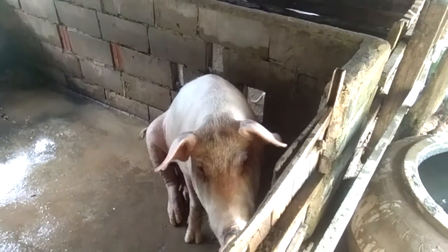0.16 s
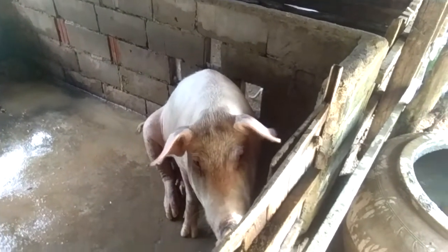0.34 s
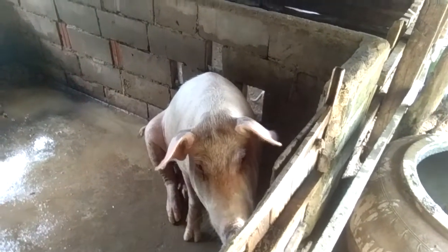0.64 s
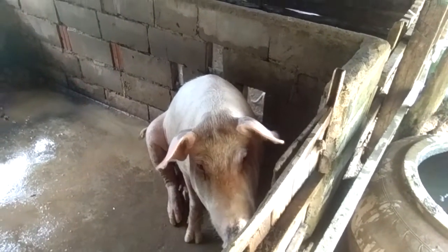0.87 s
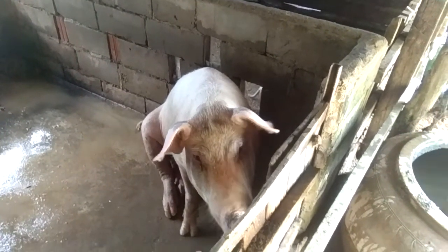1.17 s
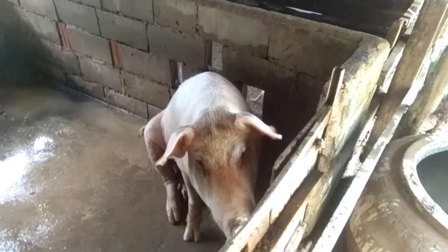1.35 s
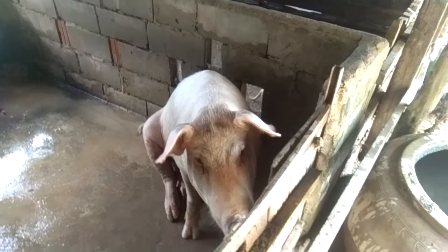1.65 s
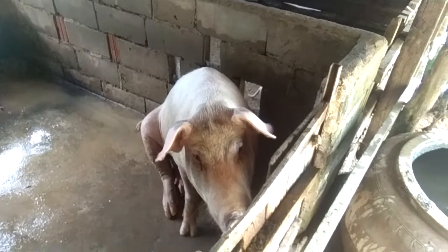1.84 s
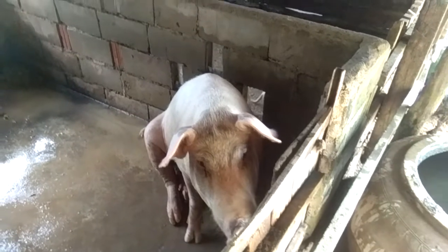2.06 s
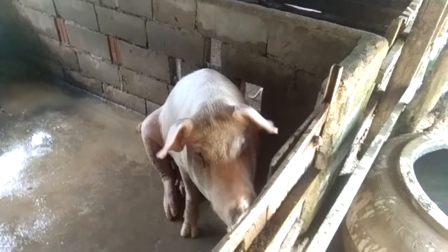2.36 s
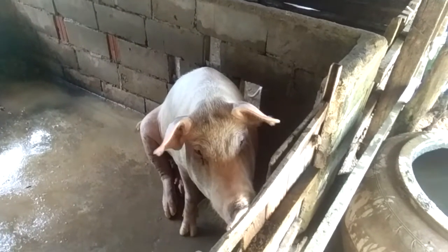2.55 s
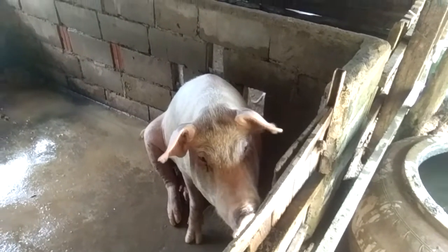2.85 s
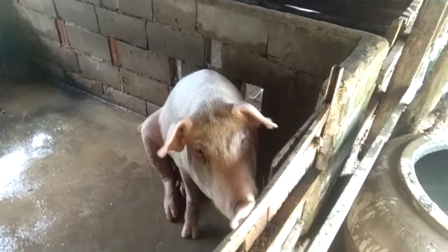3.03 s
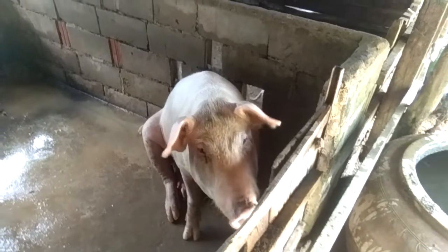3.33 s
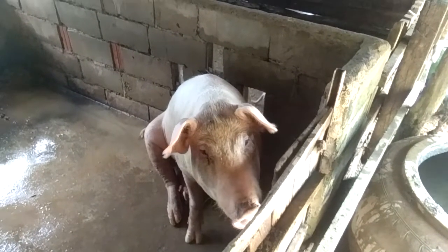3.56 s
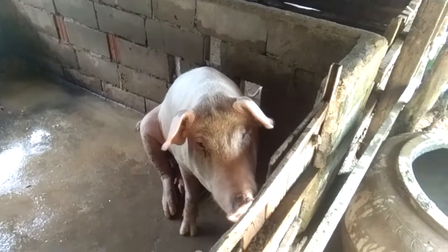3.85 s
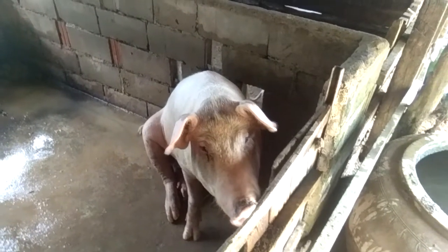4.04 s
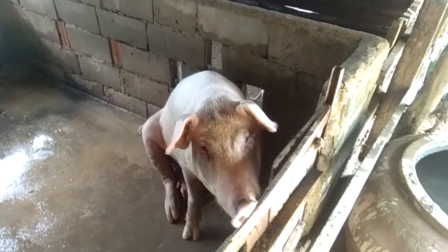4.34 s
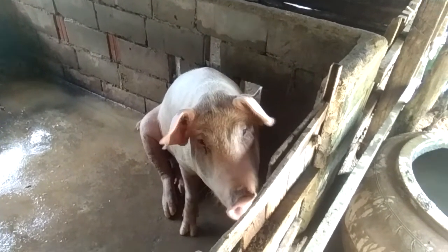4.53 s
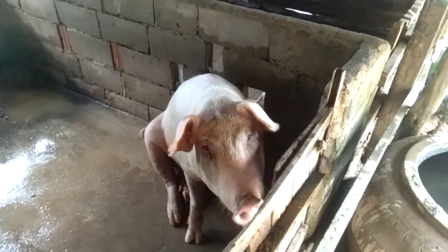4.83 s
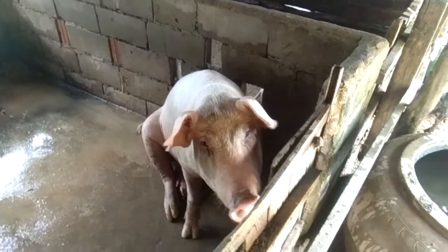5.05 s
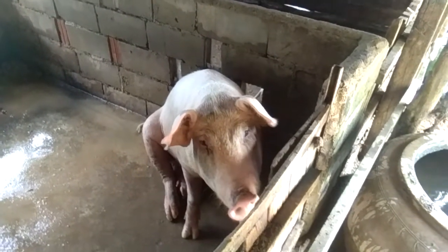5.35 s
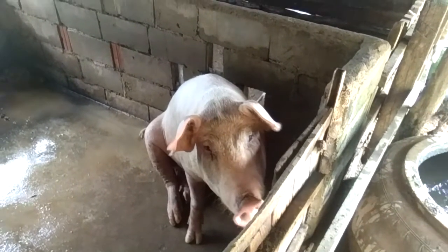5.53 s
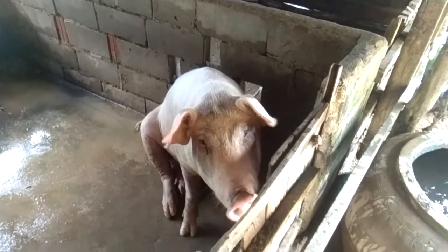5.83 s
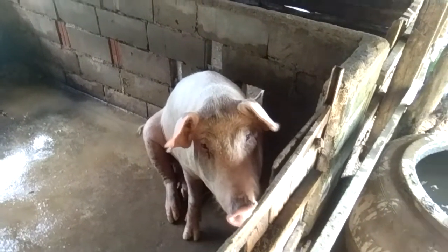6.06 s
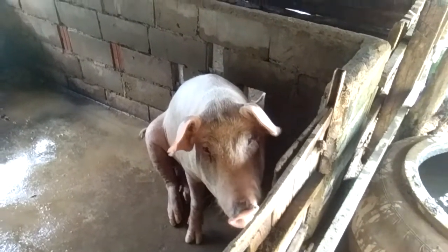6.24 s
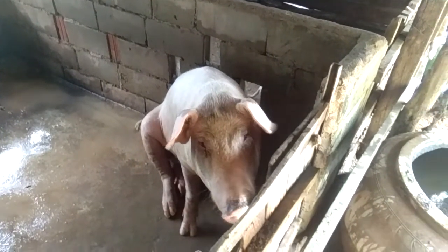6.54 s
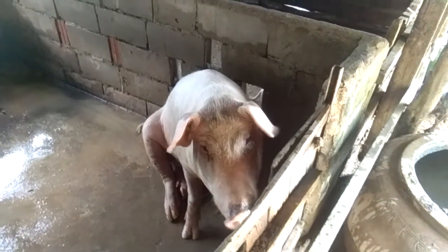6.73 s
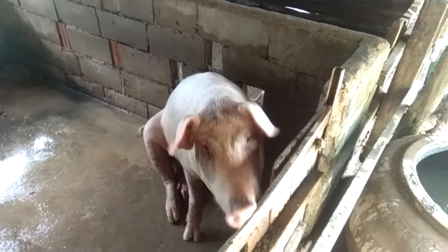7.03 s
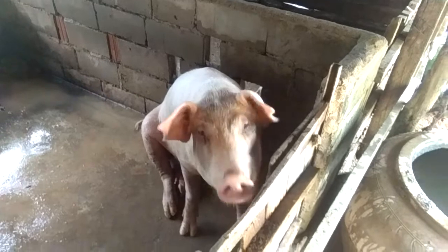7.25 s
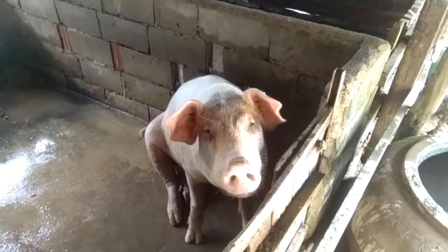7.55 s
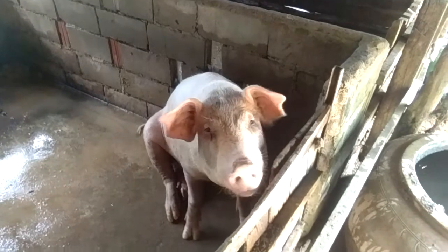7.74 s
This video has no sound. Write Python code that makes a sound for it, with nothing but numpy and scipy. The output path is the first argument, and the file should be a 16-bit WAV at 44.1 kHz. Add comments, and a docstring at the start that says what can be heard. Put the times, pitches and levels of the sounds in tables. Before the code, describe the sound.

A pig gives seven short, low, pulsing grunts in a concrete pen, with snuffles, knocks, a brief gurgle of water and faint chick peeps.

```python
"""A pig grunts seven times in a concrete pen, with soft growls, snuffles, knocks and smacks in between.
Each grunt is a few slow beats of the vocal folds ringing its throat and snout; the walls answer.
Growls are weak pulses in chest and nose, and snuffles are shaped noise. Water in a tank beside the pen
is noise spray over many ringing bubbles. Chicks whistle falling peeps, a hen gives short rough clucks,
low hum and noise make the yard air, and a far thin call of steady overtones sets in at the end."""
import sys
import numpy as np
from scipy import signal
from scipy.fft import rfft, irfft
from scipy.io import wavfile

SR = 44100
rng = np.random.default_rng(int(sys.argv[2]) if len(sys.argv) > 2 else 0)


def store_wav(level_fs):
    """Save 16-bit WAV to argv[1]."""
    pcm = np.round(np.clip(np.atleast_2d(level_fs), -1, 1) * 32767)
    wavfile.write(sys.argv[1], SR, pcm.T.astype(np.int16))


N = 347949
TIME = np.arange(N) / SR

# still yard air: f/Hz, relative level per Hz/dB
AIR_COLOUR = [(15, -60), (25, -8), (49, -30), (75, 3.5), (113, -2.5), (246, -1), (741, -8.5), (1170, -9.5),
              (1950, -14), (3340, -13), (4870, -19), (6380, -20), (8350, -25), (11500, -14.5), (15500, -22)]
AIR_DB, HUM_HZ = -58.5, 62

# air through the snout: f/Hz, relative level/dB
SNOUT_AIR_COLOUR = [(600, 0.5), (1500, 3), (3500, -3.5), (6000, -4.5), (8500, -12), (10000, -4.5),
                    (11700, 3.5), (13500, -7), (16000, -47)]
# the stronger sniffs: peak t/s, rise/s, level/dB
STRONG_SNIFFS = [(.29, 0.021, -55), (1.13, 0.059, -59), (1.3, 0.056, -57), (1.87, .03, -54.5),
                 (2.22, 0.095, -57), (2.56, 0.036, -59), (3.12, 0.095, -59), (3.71, 0.1, -55),
                 (4.38, 0.36, -60.5), (5.33, .1, -56), (6.8, 0.19, -58)]
SNIFF_FALL_PER_RISE = 1.55
PUFF_LAG_S, PUFF_RISE_S, PUFF_FALL_S = 0.066, 0.099, 0.097  # air let out after the last beat of each grunt
NOSING_DB, NOSING_SWING_DB, NOSING_RATE = -69, 2, 7.3  # faint restless air; rate in random levels per second

# short rough arched notes in pairs: a hen's clucks, and last a low note under the far call:
# t/s, first note level/dB, second note level/dB, f near the top of the first arch/Hz
NOTE_PAIRS = [(.102, -49, -50, 887), (.615, -53, -51, 884), (1.33, -54.5, -51.5, 933),
              (1.933, -53.5, -55.5, 856), (7.768, -39.5, -59, 730)]
CLUCK_S, CLUCK_GAP_S, CLUCK_DROP = 0.0273, .049, .86  # note length, spacing, pitch factor of the second note

# peeps at set times, most of them louder: t/s, length/s, top f before scoop and fall/Hz, fall/Hz, level/dB
TIMED_PEEPS = [(0.372, 0.056, 3290, 600, -56.5), (.402, .087, 3380, 446, -59.5),
               (.548, 0.032, 3190, 654, -55), (1.478, 0.076, 3400, 554, -56.5),
               (1.743, .051, 3330, 450, -61), (2.072, .058, 3390, 750, -56.5),
               (2.211, 0.046, 3600, 300, -54.5), (2.326, .043, 3090, 700, -57),
               (2.39, .068, 3620, 348, -57), (2.405, 0.046, 3075, 800, -56.5),
               (2.933, 0.121, 3510, 100, -56), (3.15, 0.076, 3680, 597, -57.5), (3.47, .06, 3350, 500, -59),
               (4.055, .1, 3450, 754, -60), (4.84, .1, 3620, 900, -64.5), (5.04, .09, 3660, 750, -61.5),
               (6.554, 0.043, 3300, 550, -57.5), (7.493, .037, 3300, 450, -56)]
# other peeps of the brood, at random: middle level, pitch and length, and fall per second of length
FLOCK_DB, FLOCK_TOP_HZ, FLOCK_PEEP_S, FLOCK_SAG_HZ_PER_S = -61.5, 3510, 0.07, 15000

# smacks of the lips, slaps of water, and snout and trotters against rail and floor:
# t/s, starting level/dB, time to die by 60 dB/s, centre f/Hz, spread/octaves
TAPS = [(.286, -50, 0.11, 5000, 1.8), (.92, -44, 0.039, 4950, .17), (1.7, -54.5, 0.14, 2020, .18),
        (2.795, -44, 0.092, 990, .55), (3.757, -47, 0.18, 2040, 1.4), (3.874, -48.5, .04, 12000, .32),
        (5.582, -38.5, 0.24, 1180, .62), (5.94, -36.5, 0.051, 636, 0.32), (5.967, -31.5, 0.065, 680, 0.87),
        (6.295, -34.5, 0.048, 10500, 0.14), (6.454, -40.5, 0.018, 6000, 0.95),
        (6.6661, -27.5, .015, 1980, 0.85), (6.667, -27, 0.015, 11200, .27), (6.755, -42, .048, 12300, .17),
        (7.003, -45, .03, 4730, .12)]

# grunts: t/s, number of beats, level of the first beat/dB, level two thirds through/dB, level of the last
# beat/dB, opening brightness/dB per octave, jaw factor on the first formant, mouth gain near 1 kHz at the
# last beat (half that at the first)/dB, snout gain near 2.4 kHz at the first beat (fades to 0)/dB,
# closing puff level/dB
GRUNT_LIST = [(.779, 4, -8.5, -2, -2.5, 2, 1.037, 0.5, 9.5, -50),
              (3.317, 5, -9.5, -.5, -14, 2, 1, -1, 13, -48),
              (4.583, 4, -7.5, 1.5, -9, 0.8, 1.053, 1, 6.5, -54),
              (5.174, 3, -1, 2, 2.5, 0.26, 1.07, -1.5, -8, -61),
              (6.052, 4, -6.5, 1.5, -3, 0.2, 1.055, 2, 3.5, -61),
              (7.0567, 3, -3.5, .5, 5.5, .5, 1.085, 5, 3, -56.5),
              (7.643, 4, -3, 3.5, -2.5, 2, 1.22, 2.5, -7, -53)]
# throat and snout resonances: f/Hz, width/Hz, level/dB
THROAT_RESONANCES = [(90, 35, 13.5), (154, 87, 2), (238, 112, 16.5), (329, 113, 25.5), (423.5, 69, 15.5),
                     (580, 70, 13.5), (794, 100, 1), (1011, 159, 14), (1248, 160, 7), (1465, 127, 12),
                     (1567, 220, 5.5), (2246, 1040, -5), (3250, 610, 2.5), (4020, 860, -12),
                     (5160, 630, -7), (6390, 380, -10), (11300, 2200, -16)]
BEAT_S = .0343  # from one beat to the next
# the soft beat before a grunt: how early, dB against the main level, dB per octave
LEAD_S, LEAD_DB, LEAD_BRIGHT = .027, -17.5, -2
END_BRIGHT, BRIGHT_PER_DB = -0.53, 0.1035  # a grunt ends duller (dB per octave) the weaker its last beat is
CHEST_PER_SNOUT_DB = 0.44  # a grunt that goes through the snout also has the fuller bass

# soft closed-mouth growls: t/s, length/s, level/dB, pitch f/Hz, chest f/Hz, nose f/Hz, nose level/dB
GROWL_LIST = [(1.36, 0.068, -51, 87.7, 200, 480, 2), (1.409, 0.083, -41.5, 177.9, 213, 513, 2),
              (4.224, .036, -51.5, 113.6, 246, 596, -7), (4.293, .18, -48.5, 70.06, 193, 620, -3.5),
              (5.112, .055, -38, 104.8, 310, 445, -20), (5.268, 0.13, -49, 61, 192, 360, -9),
              (6.635, 0.23, -50, 58, 206, 730, -6.5)]
ROUGH_AT_100_HZ, ROUGH_PER_OCTAVE = .5, -0.294  # the lower a growl, the rougher

# gushes of water into the tank: t/s, length/s, flow level/dB
GUSH_LIST = [(5.37, .048, -40.5), (5.457, .045, -40.5), (5.556, 0.04, -44), (5.61, 0.52, -49.5),
             (5.69, 0.14, -45), (5.931, 0.075, -45.5), (6.097, 0.17, -42)]
# droplets: f/Hz, relative level/dB
DROPLET_COLOUR = [(2500, -10), (4000, -7), (6000, -1), (8500, -5.5), (11500, 8), (13500, 0), (16000, -10)]
# slosh: f/Hz, relative level/dB
BUBBLE_COLOUR = [(300, 10), (600, -6.5), (1000, -0.5), (2000, -1), (3500, -2), (6000, -9), (9000, -24)]
GUSH_RISE_S, GUSH_FALL_DB_PER_S = 0.03, 315
SETTLE_DB, SETTLE_FALL_DB_PER_S = -15.5, 30  # the water keeps stirring: dB against the gush, and its decay
SLOSH_DB, SLOSH_FOLLOW, FULL_FLOW_DB = -42.5, .85, -40.5  # slosh at full flow, and its dB per dB of flow
# the loudest bubbles: t/s, level/dB, starting f/Hz
LOUD_BUBBLES = [(5.4, -36.5, 2504), (5.455, -36, 2350), (5.592, -34, 457), (5.675, -33, 866),
                (5.7, -34.5, 717), (5.78, -34, 794), (5.862, -36, 631), (6.23, -36, 850),
                (6.247, -37, 2440)]
FAINT_PLOP_DB, FAINT_PLOP_LOW_HZ, FAINT_PLOP_HIGH_HZ = -42, 447, 1910

# overtones of the far call: multiple of its pitch, relative level/dB
CALL_OVERTONES = [(1, 0), (2, -1), (3, -17), (4, -27), (5, -10.5), (6, -24), (8, -25)]
CALL_HZ, CALL_DB, CALL_START_S = 755, -37, 7.617
CALL_RISE_S, CALL_HOLD_S, CALL_FALL_DB_PER_S = 0.042, .16, 183  # the hold includes the rise

# ring of the pen: f/Hz, time to die by 60 dB/s
PEN_RING = [(100, 0.38), (400, 0.23), (1200, 0.25), (3500, 0.19), (12000, 0.19)]
# first echoes off the walls: delay/s, gain as a plain factor
WALL_ECHOES = [(.0042, 0.14), (0.0119, 0.062), (0.0179, .16), (.021, 0.017)]
EDGE_HZ = 15750


def amp(db):
    """Turns decibels into a plain factor."""
    return 10 ** (np.asarray(db) / 20)


def unit(x):
    """Scales x to an average strength (rms) of 1."""
    return x / np.sqrt(np.mean(x ** 2) + 1e-20)


def read(points, hz):
    """Reads a curve joined by straight lines over log frequency."""
    f, value = np.transpose(points)
    return np.interp(np.log(hz + 1), np.log(f + 1), value)


def add(mix, s, sound):
    """Lays a sound into the mix from second s, cut at the end of the mix."""
    part = mix[max(round(s * SR), 0):][:len(sound)]
    part += sound[:len(part)]


def colour(x, points):
    """Shapes the spectrum of x and gives it an rms of 1."""
    gain = amp(read(points, np.fft.rfftfreq(len(x), 1 / SR)))
    return unit(irfft(rfft(x) * gain, len(x)))


def causal(gain):
    """The sharpest-starting ring (minimum phase) with this gain at each frequency."""
    both_sides = np.r_[gain, gain[-2:0:-1]]
    log_gain = np.log(np.maximum(both_sides, 1e-5))
    return np.fft.ifft(np.exp(np.conj(signal.hilbert(log_gain)))).real


def resonate(x, hz, width):
    """A resonance of gain 1 whose pitch can follow a curve."""
    turn = np.exp(2j * np.pi * np.cumsum(hz * np.ones(len(x))) / SR)
    r = np.exp(-np.pi * width / SR)
    # shift the band down to zero, smooth it, shift it back up
    return 2 * (turn * signal.lfilter([1 - r], [1, -r], x / turn)).real


def band(x, hz, width):
    """Two equal resonances in a row, scaled to rms 1."""
    return unit(resonate(resonate(x, hz, width), hz, width))


def noise(t):
    """White noise as long as t, up to half a second."""
    return rng.standard_normal(SR // 2)[:len(t)]


def drift(t, rate):
    """Random wander of about unit size, with rate new values a second joined by lines."""
    return np.interp(t * rate, np.arange(2048), rng.standard_normal(2048))


def held(s, rise_s, length_s, fall_db_per_s):
    """A loudness shape that rises from s, holds until its length is over, then dies away."""
    rise = np.clip((TIME - s) / rise_s, 0, 1) ** 2
    return rise * amp(-fall_db_per_s * np.maximum(TIME - s - length_s, 0))


def swell(s, rise_s, fall_s):
    """A rounded loudness shape that peaks at s."""
    return np.exp(-((TIME - s) / np.where(TIME < s, rise_s, fall_s)) ** 2)


def yard(hum_db=-65):
    """Still farm air as shaped noise, with a low wavering hum from narrow-band noise."""
    hum = band(rng.standard_normal(N), HUM_HZ, 10.5)
    air_level = amp(AIR_DB + .5 * drift(TIME, 5.6))
    return air_level * colour(rng.standard_normal(N), AIR_COLOUR) + amp(hum_db) * hum


def snuffles(flicker_db=3.0):
    """Air hisses in the pig's wet snout: a puff after each grunt, single sniffs, and faint nosing about."""
    breaths = np.zeros(N)
    for s, count, *_, db in GRUNT_LIST:
        last_beat_s = s + (count - 1) * BEAT_S
        breaths += amp(db) * swell(last_beat_s + PUFF_LAG_S, PUFF_RISE_S, PUFF_FALL_S)
    for s, rise_s, db in STRONG_SNIFFS:
        breaths += amp(db) * swell(s, rise_s, rise_s * SNIFF_FALL_PER_RISE)
    nosing = amp(NOSING_DB + NOSING_SWING_DB * drift(TIME, NOSING_RATE))
    flicker = amp(flicker_db * drift(TIME, 25))
    return np.hypot(breaths, nosing) * flicker * colour(rng.standard_normal(N), SNOUT_AIR_COLOUR)


def clucks(rough=0.87, arch=0.39):
    """Short rough arched notes in pairs, the second lower: a hen's clucks, last a low note under the call."""
    out, t = np.zeros(N), np.arange(0, CLUCK_S, 1 / SR)
    hump = np.sin(np.pi * t / CLUCK_S)
    for s, first_db, second_db, hz in NOTE_PAIRS:
        for k, db in enumerate((first_db, second_db)):
            pitch = hz * CLUCK_DROP ** k * (1 + arch * (hump - .8))
            tone = np.sin(2 * np.pi * np.cumsum(pitch) / SR)
            rasp = unit(resonate(resonate(noise(t), pitch, 500), pitch, 530))
            add(out, s + k * CLUCK_GAP_S, amp(db) * unit((tone + rough * rasp) * hump))
    return out


def peep(length, top_hz, fall_hz, waver=0.013, octave_db=-20, scoop_hz=320, scoop_s=.007, bend=1.6):
    """A near-pure whistle that scoops up, arches over and falls."""
    t = np.arange(0, length, 1 / SR)
    hz = top_hz - fall_hz * (t / length) ** bend - scoop_hz * np.exp(-t / scoop_s)
    phase = 2 * np.pi * np.cumsum(hz * (1 + waver * drift(t, 179))) / SR
    whistle = np.sin(phase) + amp(octave_db) * np.sin(2 * phase)
    return whistle * signal.windows.tukey(len(t), .3)


def peeps(length_spread=0.32, pitch_spread=.05, spread_db=1.5, count=16):
    """Peeps of chicks at set times, mostly clear; others faint at uneven intervals."""
    out = np.zeros(N)
    for s, length, top_hz, fall_hz, db in TIMED_PEEPS:
        add(out, s, amp(db) * peep(length, top_hz, fall_hz))
    for k, (when, long, high, loud) in enumerate(rng.uniform(-1, 1, (count, 4))):
        s = (k + .5 + .5 * when) / count * N / SR
        length = FLOCK_PEEP_S * (1 + length_spread * long)
        top_hz = FLOCK_TOP_HZ * (1 + pitch_spread * high)
        add(out, s, amp(FLOCK_DB + spread_db * loud) * peep(length, top_hz, FLOCK_SAG_HZ_PER_S * length))
    return out


def knocks():
    """Dead taps and scuffs: each a noise burst in one band that dies quickly."""
    out, t = np.zeros(N), np.arange(SR // 5) / SR
    octaves = np.log2(np.fft.rfftfreq(len(t), 1 / SR) + 1)
    for s, db, t60, hz, spread in TAPS:
        bell = np.exp(-((octaves - np.log2(hz)) / spread) ** 2 / 2)
        burst = unit(irfft(rfft(noise(t)) * bell, len(t)))
        add(out, s, burst * amp(db - 60 * t / t60))
    return out


def throat_ring(f, bright, jaw, mouth_db, snout_db, chest_db, wander=0.0039):
    """How throat and snout ring after one sharp push, with slightly random resonances."""
    hz, width, db = np.transpose(THROAT_RESONANCES)
    # the jaw moves the first formant
    hz = hz * (1 + wander * noise(hz)) * np.where((hz > 280) & (hz < 500), jaw, 1)
    # an open mouth draws the second formant down from 1.5 kHz to 1 kHz
    db = db + mouth_db * (np.exp(-((hz - 1030) / 200) ** 2) - 2.6 * np.exp(-((hz - 1550) / 180) ** 2))
    db = db + snout_db * np.exp(-((hz - 2350) / 300) ** 2) + chest_db * (hz < 120)
    peaks = amp(db) / (1 + (2 * (f[:, None] - hz) / width) ** 2)
    tilt = amp(bright * np.log2(np.clip(f, 400, 4000) / 400))
    bass_cut = f ** 2 / np.hypot(f ** 2, 55 ** 2)
    return causal(np.linalg.norm(peaks, axis=1) * tilt * bass_cut)


def beat(bright, jaw, mouth_db, snout_db, chest_db, open_s=.0082, shut=0.27, pop_hz=1300, flutter=0.98,
         flutter_hz=620, puff_db=-38, delay_hz=420, delay_q=0.86, size=4096):
    """The folds pop open, flutter in the rush of air, and slap shut with the opposite sign."""
    f, t = np.fft.rfftfreq(size, 1 / SR), np.arange(size) / SR
    ring = throat_ring(f, bright, jaw, mouth_db, snout_db, chest_db)
    # the opening and closing pops are dull; the rushing air brings the treble
    closing = shut * np.interp(t - open_s, t, ring, left=0)
    pops = signal.lfilter(*signal.butter(1, pop_hz, fs=SR), closing - ring)
    # the long snout delays the band of its first formant, which rounds the pop
    poles = signal.iirpeak(delay_hz, delay_q, fs=SR)[1]
    pops = signal.lfilter(poles[::-1], poles, pops)
    # the rush fades while the folds are open, then drops at once just before they shut
    rush_level = np.interp(t, [0, .002, open_s], [1.66, 2.1, 0.31])
    rush = noise(t) * np.where(t > 0.86 * open_s, 0.012, rush_level)
    rush = signal.lfilter(*signal.butter(2, flutter_hz, "high", fs=SR), rush / np.linalg.norm(rush))
    # the puff whistles upward in the snout while the folds are open
    whistle_hz = np.interp(t, [0, open_s, 3 * open_s], [2950, 3600, 3400])
    puff = band(noise(t), whistle_hz, 270) * np.exp(-((t - .0058) / 0.0041) ** 2)
    return pops + flutter * signal.fftconvolve(rush, ring)[:size] + amp(puff_db + bright) * puff


def grunts(dulling=0.11):
    """A soft lead-in, then slow beats whose loudness and brightness change as the air runs out."""
    out = np.zeros(N)
    for s, count, first_db, main_db, last_db, bright_first, jaw, mouth_db, snout_db, _ in GRUNT_LIST:
        add(out, s - LEAD_S, amp(main_db + LEAD_DB) * beat(LEAD_BRIGHT, jaw, 0, 0, 0))
        bright_last = END_BRIGHT + BRIGHT_PER_DB * last_db
        chest_db = CHEST_PER_SNOUT_DB * snout_db
        for k in range(count):
            progress = k / (count - 1)
            db = np.interp(progress, [0, 2 / 3, 1], [first_db, main_db, last_db])
            bright = bright_first + (bright_last - bright_first) * progress ** dulling
            mouth_now, snout_now = mouth_db * (1 + progress) / 2, snout_db * (1 - progress)
            add(out, s + k * BEAT_S, amp(db) * beat(bright, jaw, mouth_now, snout_now, chest_db))
    return out


def growls(jitter=.35, breathy=0.11, rasp_db=-16):
    """Uneven weak pulses and air ring the chest and the nose."""
    out = np.zeros(N)
    for s, length, db, pitch_hz, chest_hz, nose_hz, nose_db in GROWL_LIST:
        t = np.arange(0, length, 1 / SR)
        rough = np.clip(ROUGH_AT_100_HZ + ROUGH_PER_OCTAVE * np.log2(pitch_hz / 100), 0, 1)
        turns = np.cumsum(pitch_hz * (1 + rough * jitter * drift(t, 70))) / SR
        pulses = np.diff(np.floor(turns), prepend=-1)  # one click per whole turn
        drive = pulses + rough * breathy * noise(t)
        voice = band(drive, chest_hz, 166) + amp(nose_db) * band(drive, nose_hz, 158)
        voice += amp(rasp_db) * band(drive, 1400, 1400)
        add(out, s, amp(db) * unit(voice * np.sin(np.pi * t / length)))
    return out


def bubble(t, hz, t60, rise=2.6):
    """A pocket of air rings and climbs in pitch as it nears the surface."""
    ring = np.sin(2 * np.pi * np.cumsum(hz * (1 + rise * t)) / SR)
    return ring * amp(-60 * t / t60) * (1 - np.exp(-t / 0.00046))


def gush(s, length):
    """Water pours, stops quickly, and goes on stirring faintly."""
    pour = held(s, GUSH_RISE_S, length, GUSH_FALL_DB_PER_S)
    stir = amp(SETTLE_DB) * held(s, GUSH_RISE_S, length, SETTLE_FALL_DB_PER_S)
    return np.maximum(pour, stir)


def water(drops_per_s=700, spray_db=-1, lumps_db=2, bubbles_per_s=80, cycles=26, clump_db=3.0,
          clump_rate=35, count=40):
    """Each gush sprays droplets over a slosh of small bubbles, which come in clumps of like size."""
    flow = np.max([amp(db) * gush(s, length) for s, length, db in GUSH_LIST], axis=0)
    flow = flow * amp(lumps_db * drift(TIME, 45))
    # steady faint noise with sparse strong clicks
    drops = rng.standard_normal(N) * (0.12 + (rng.random(N) < drops_per_s / SR))
    t, slosh = np.arange(SR // 10) / SR, np.zeros(N)
    for hz in np.geomspace(450, 6000, count):
        chance = bubbles_per_s * np.sqrt(hz / 1000) / SR
        births = rng.uniform(0.1, 1, N) * (rng.random(N) < chance)
        rings = signal.oaconvolve(births, bubble(t, hz, cycles / hz))[:N]
        slosh += rings * hz * amp(clump_db * drift(TIME, clump_rate))
    slosh_level = amp(SLOSH_DB) * (flow / amp(FULL_FLOW_DB)) ** SLOSH_FOLLOW
    return colour(slosh, BUBBLE_COLOUR) * slosh_level + colour(drops, DROPLET_COLOUR) * flow * amp(spray_db)


def plops(plop_t60=0.073, count=7):
    """A few loud bubbles ring out, with fainter ones at random."""
    out, t = np.zeros(N), np.arange(SR // 10) / SR
    first_s, last_s = GUSH_LIST[0][0], GUSH_LIST[-1][0]
    for s, db, hz in LOUD_BUBBLES:
        add(out, s, amp(db) * bubble(t, hz, plop_t60))
    for k, (when, high) in enumerate(rng.random((count, 2))):
        s = first_s + (last_s - first_s) * (k + when) / count
        hz = FAINT_PLOP_LOW_HZ * (FAINT_PLOP_HIGH_HZ / FAINT_PLOP_LOW_HZ) ** high
        add(out, s, amp(FAINT_PLOP_DB) * bubble(t, hz, plop_t60))
    return out


def far_call(waver=0.0052):
    """One held reedy note: overtones that waver together in pitch."""
    phase = 2 * np.pi * np.cumsum(CALL_HZ * (1 + waver * drift(TIME, 80))) / SR
    note = sum(amp(db) * np.sin(multiple * phase) for multiple, db in CALL_OVERTONES)
    return note * amp(CALL_DB) * held(CALL_START_S, CALL_RISE_S, CALL_HOLD_S, CALL_FALL_DB_PER_S)


def pen(x, build_s=0.0077):
    """Diffuse ring of the concrete walls, each band dying at its own speed."""
    taps = rng.standard_normal(SR // 2) * (rng.random(SR // 2) < .15)
    hz, t, z = signal.stft(taps, SR, nperseg=256)
    decay = amp(-60 * t / read(PEN_RING, hz)[:, None])
    tail = signal.istft(z * decay, SR, nperseg=256)[1]
    tail *= np.clip(TIME[:len(tail)] / build_s - .3, 0, 1)  # the echoes need a moment to gather
    return signal.fftconvolve(x, tail / np.linalg.norm(tail))[:N]


def scene(near_wet_db=-6.5, far_wet_db=-3):
    """The pig and the water are near, the fowl farther off with more of the pen's ring."""
    far = clucks() + peeps()
    near = knocks() + grunts() + growls() + water() + plops()
    echoes = sum(gain * np.interp(TIME - delay, TIME, near, left=0) for delay, gain in WALL_ECHOES)
    room = pen(amp(near_wet_db) * near + amp(far_wet_db) * far)
    return (yard() + snuffles() + far + near + echoes + room + far_call())[None]


def record(dry):
    """Cuts off the treble above the edge with a steep filter."""
    low_pass = signal.firwin(511, EDGE_HZ, window=("kaiser", 9), fs=SR)
    return signal.oaconvolve(dry, low_pass[None], "same")


dry = scene()
out = record(dry)
store_wav(out)
```